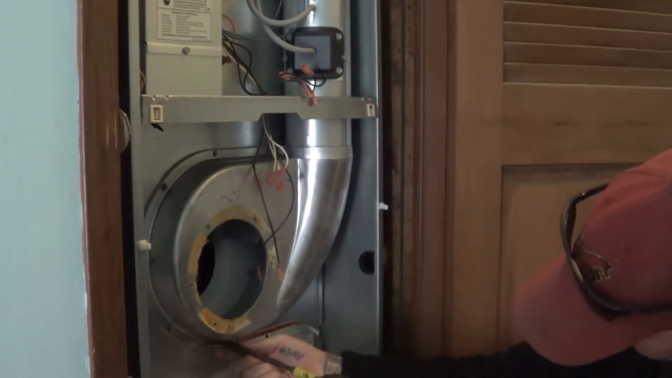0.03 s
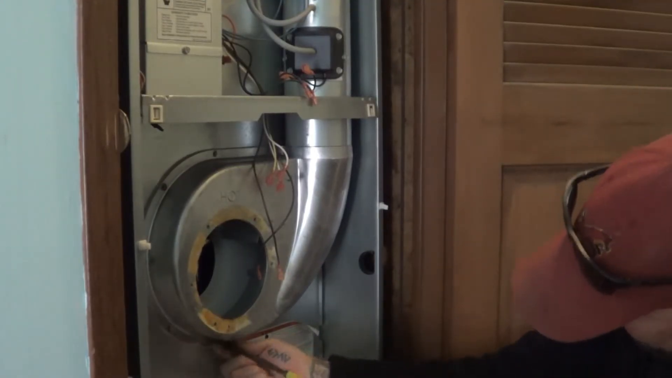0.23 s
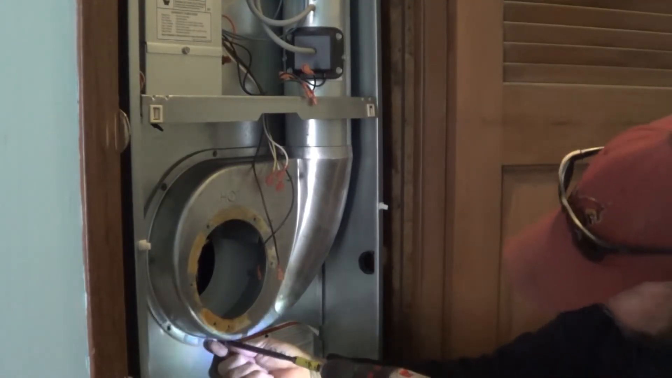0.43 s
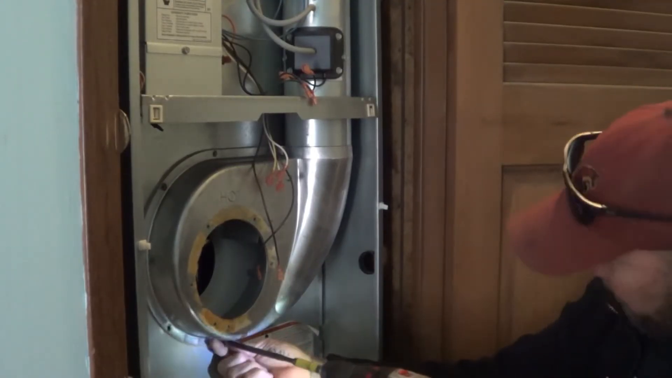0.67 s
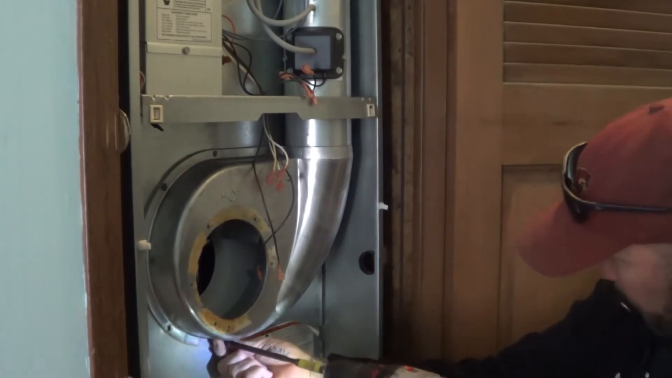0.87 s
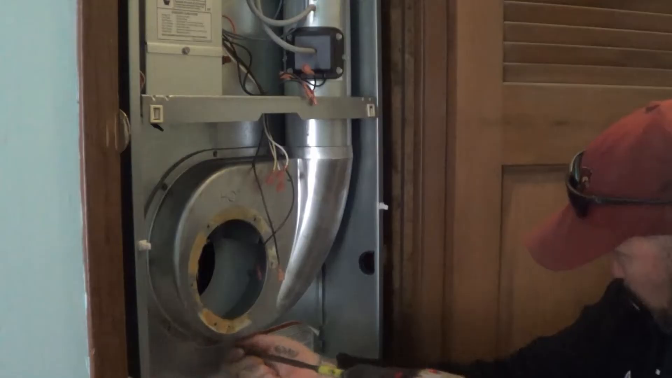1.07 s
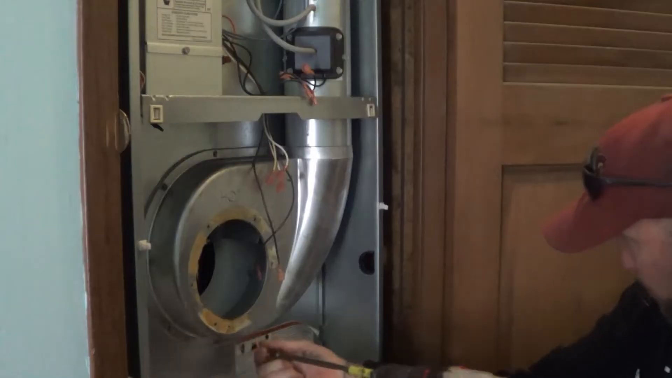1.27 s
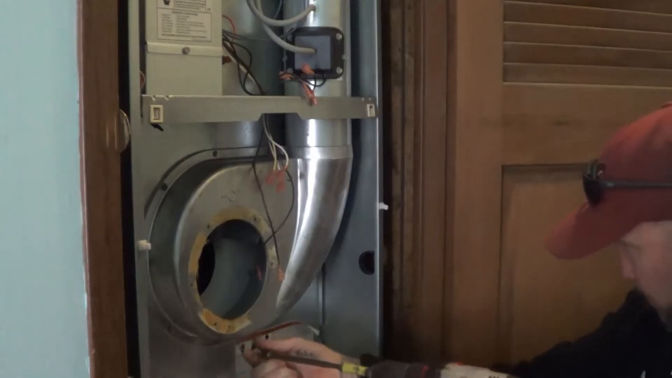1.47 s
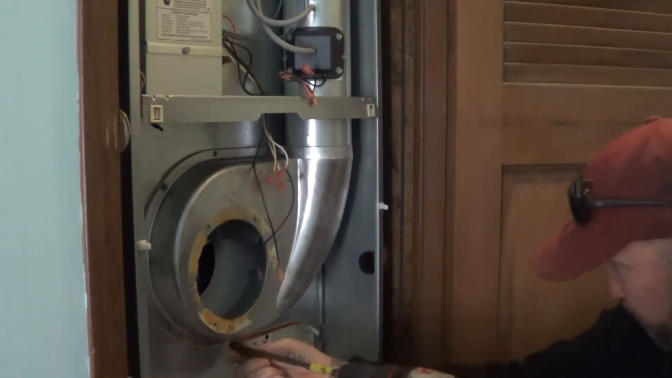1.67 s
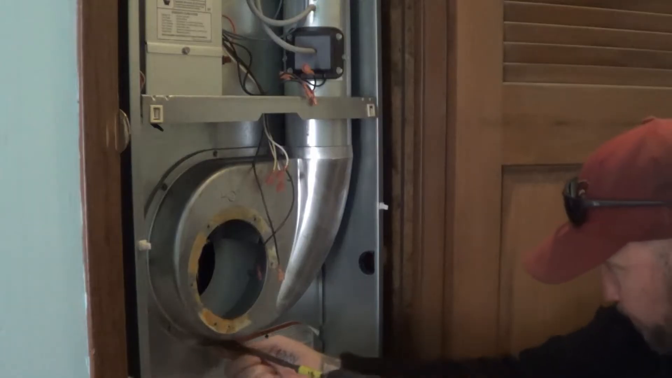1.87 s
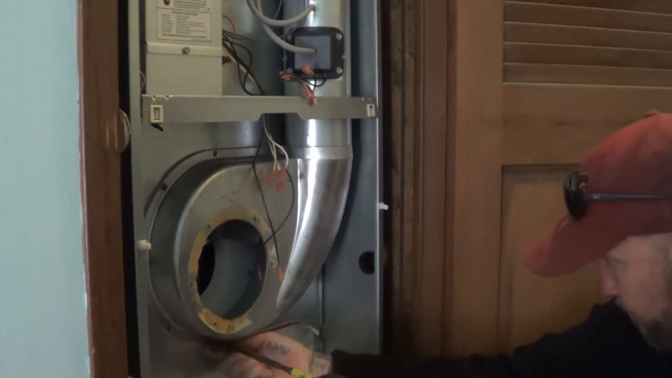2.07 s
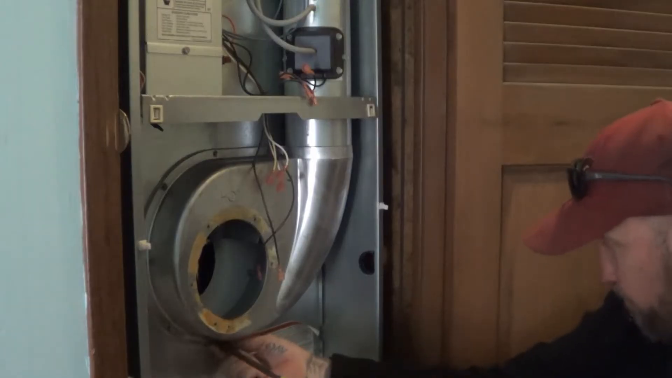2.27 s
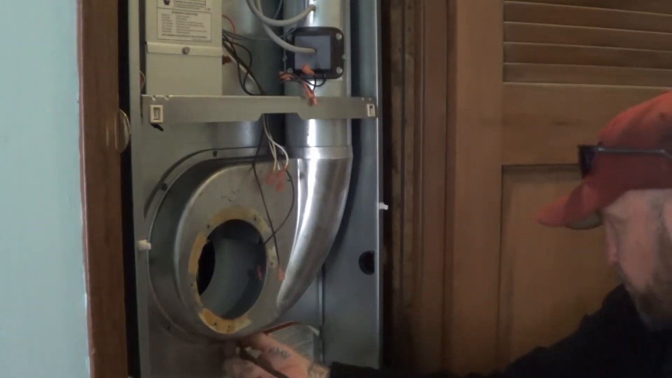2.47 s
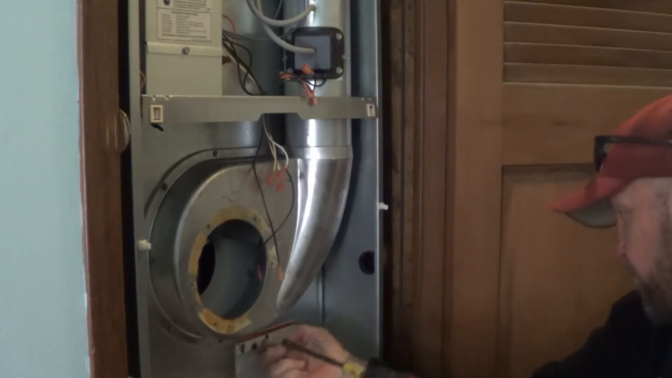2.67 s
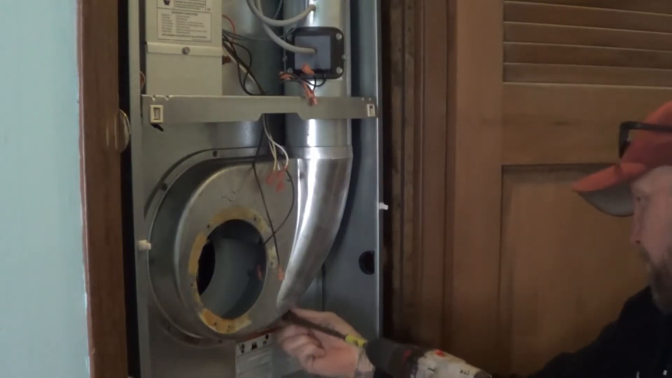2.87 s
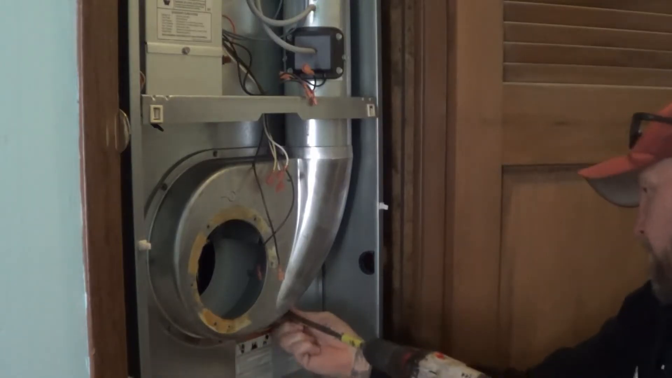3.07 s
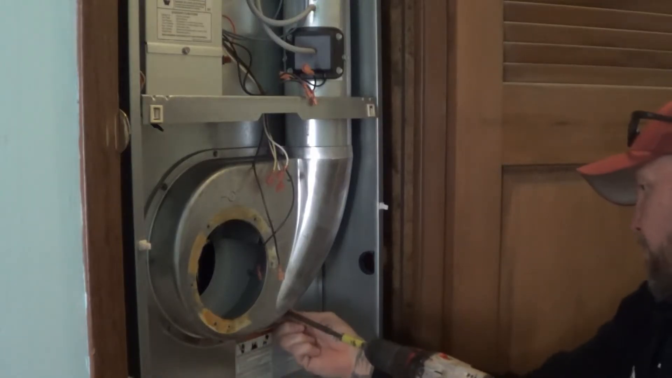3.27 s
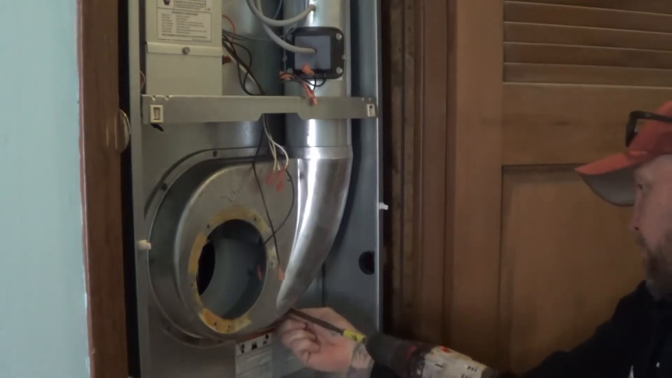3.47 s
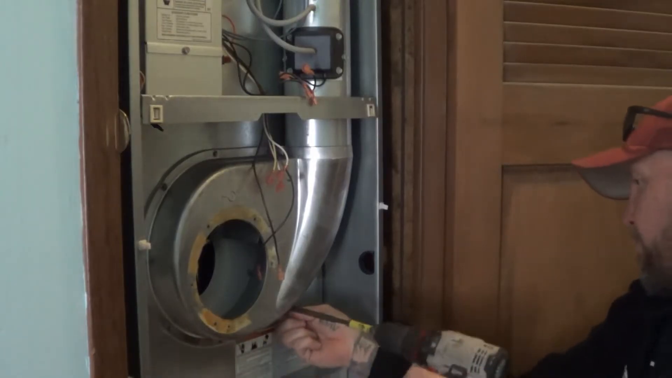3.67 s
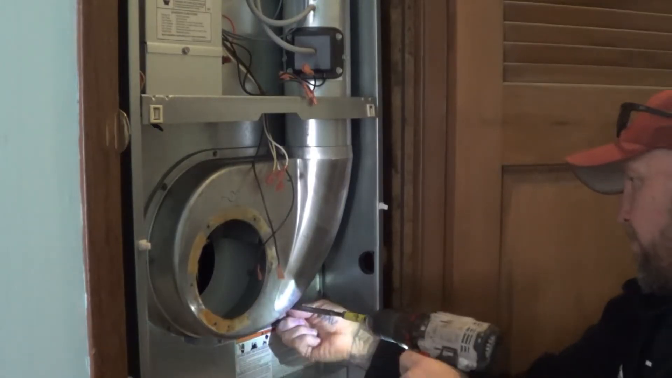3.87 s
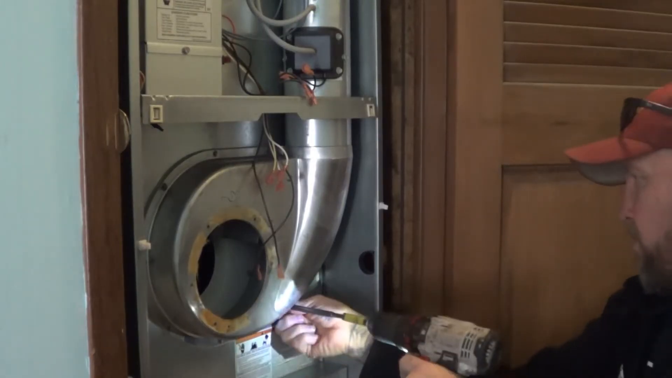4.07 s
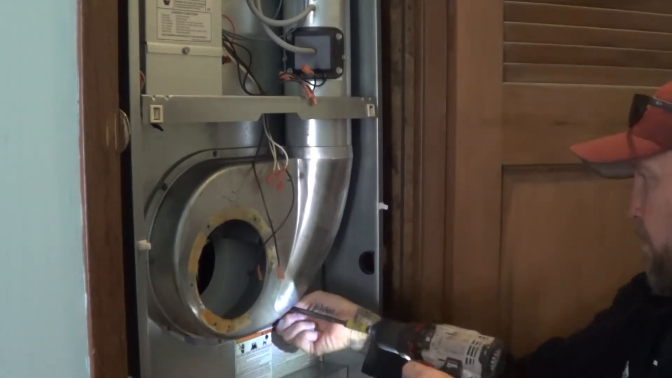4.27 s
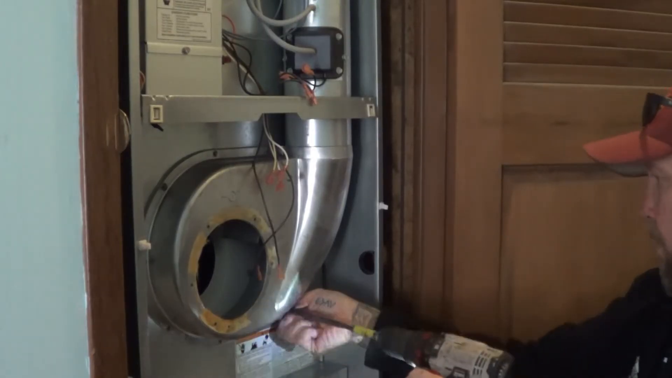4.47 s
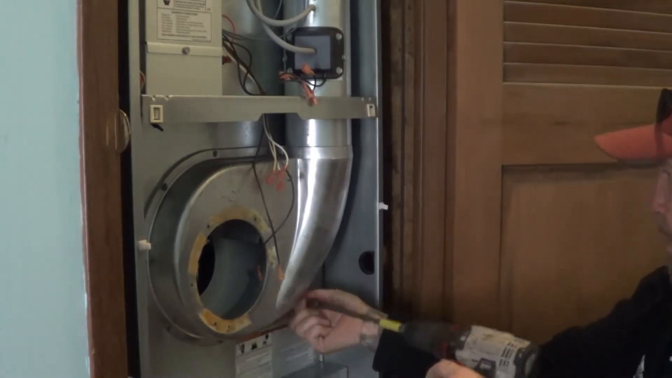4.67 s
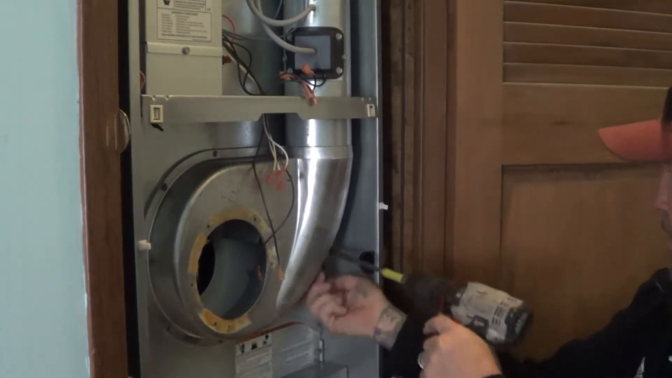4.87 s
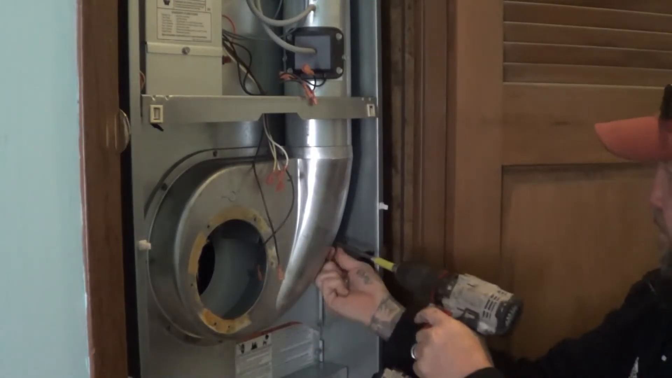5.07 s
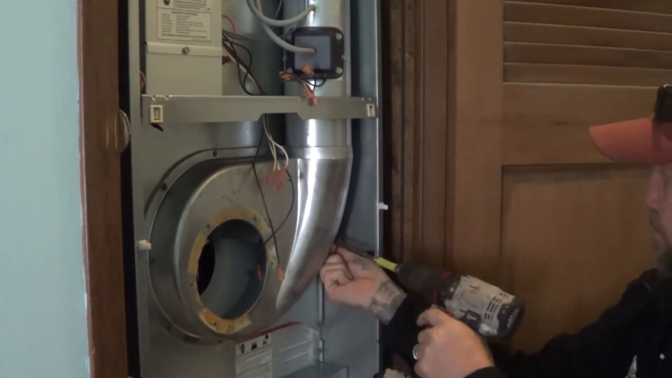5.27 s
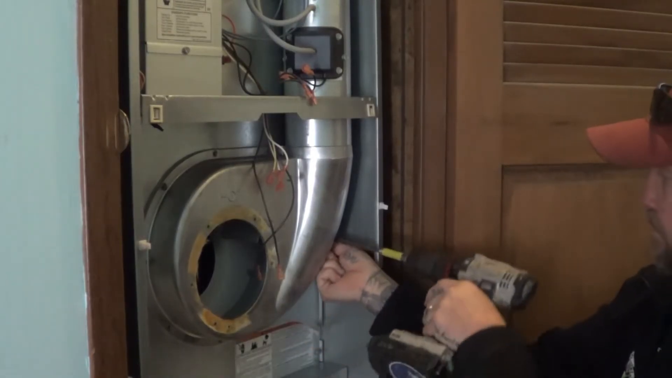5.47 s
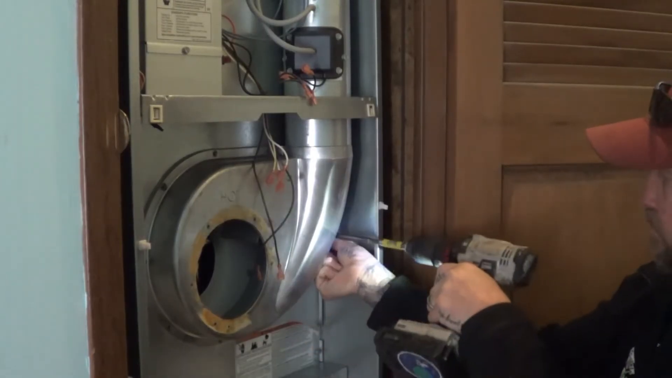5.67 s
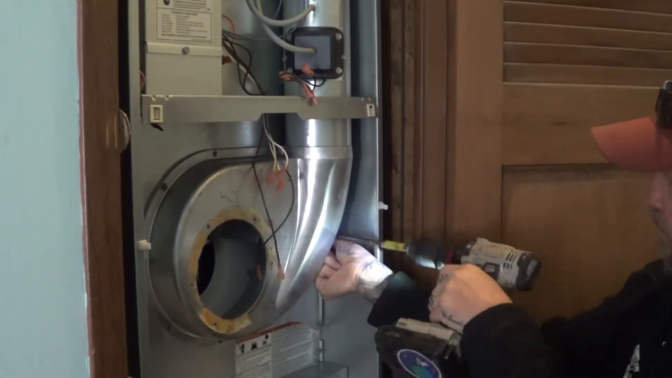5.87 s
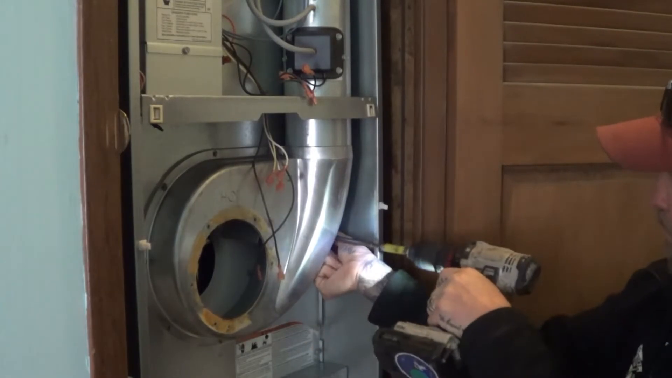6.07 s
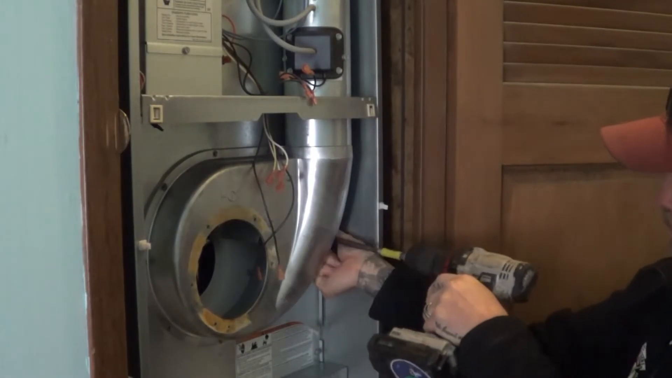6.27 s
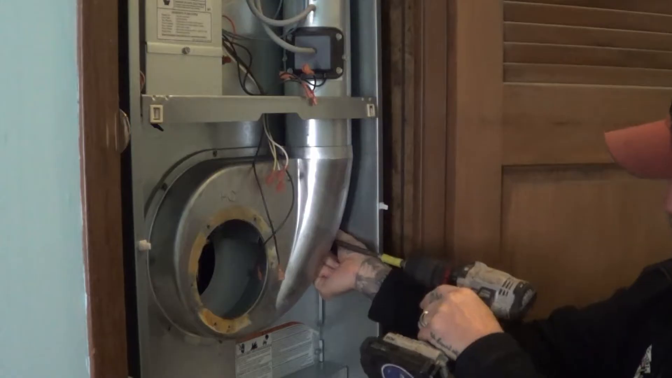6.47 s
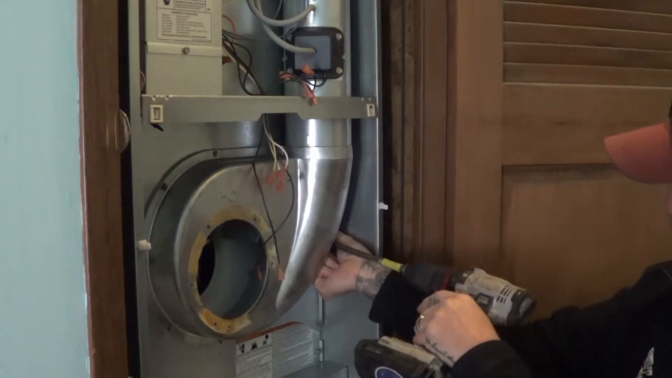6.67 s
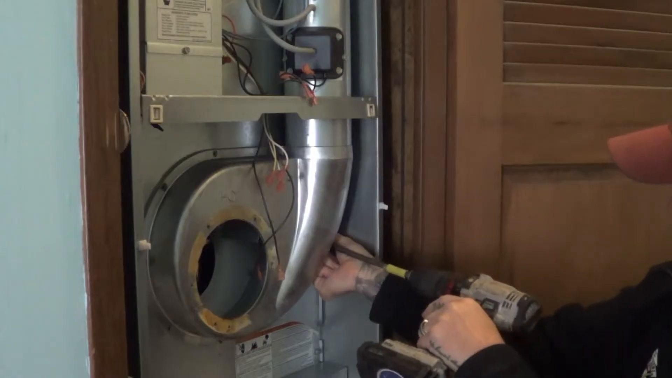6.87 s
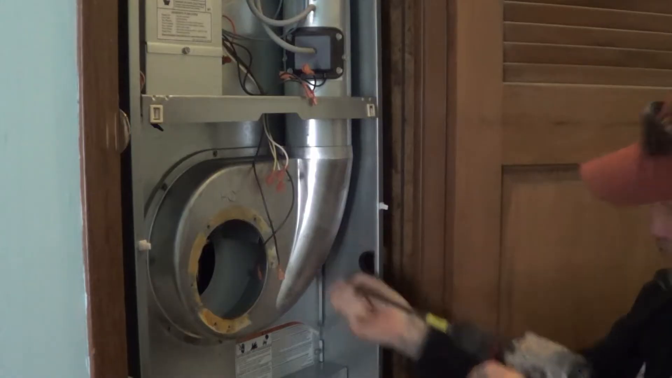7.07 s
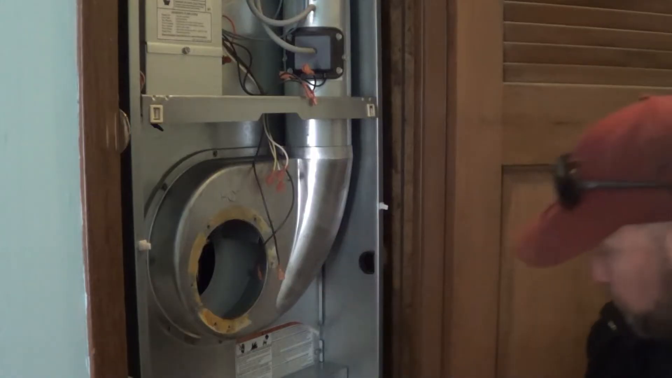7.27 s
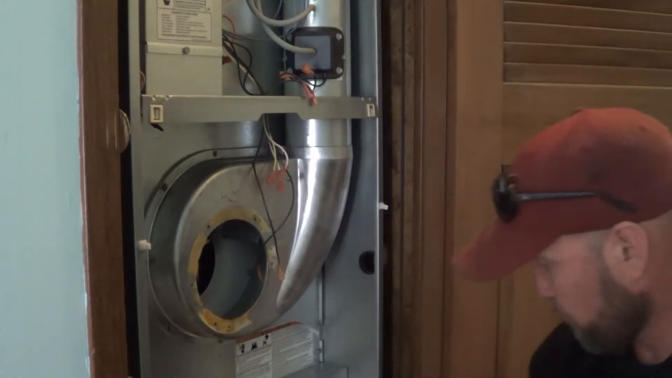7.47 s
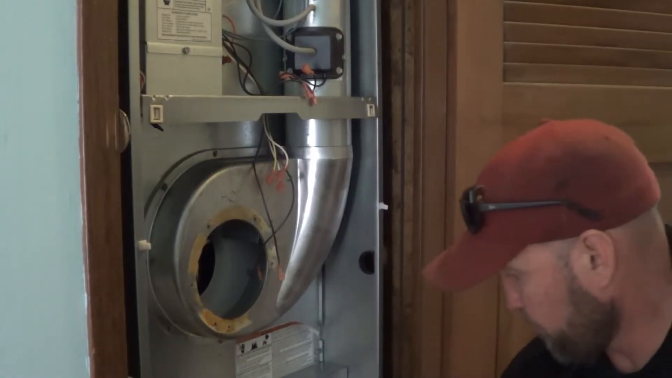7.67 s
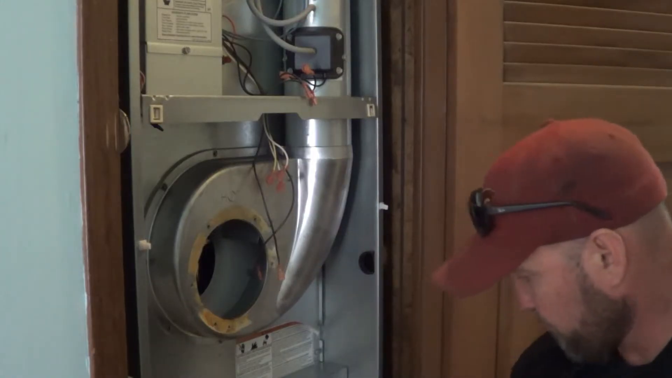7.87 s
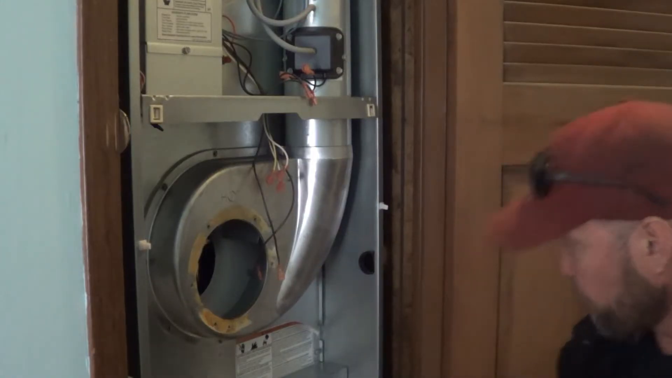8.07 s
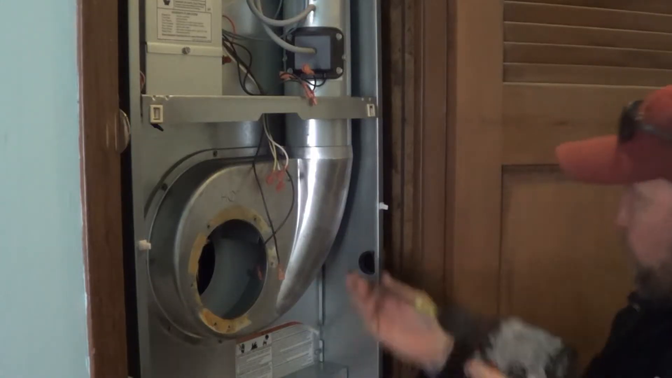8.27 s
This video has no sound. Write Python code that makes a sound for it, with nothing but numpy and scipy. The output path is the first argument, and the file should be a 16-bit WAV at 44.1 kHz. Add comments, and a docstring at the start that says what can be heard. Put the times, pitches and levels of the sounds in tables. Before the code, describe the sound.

A cordless drill whirs in three half-second gritty bursts and a final blip, rattling sheet metal, with knocks, scrapes and clicking loose screws between.

```python
"""A cordless drill backs four screws out of a sheet-metal blower housing in a small room.
Each pull spins up against a tight screw: pulsed grit, gear tones and a shaken panel, brighter with speed.
Between the runs the long bit knocks, rubs and slides on the panels: noise bursts and ringing modes.
Loose screws click together, over room rumble, hiss and electrical tones.
The microphone's limiter ducks the room after every loud moment."""
import sys
import numpy as np
from scipy import signal
from scipy.fft import rfft, irfft
from scipy.io import wavfile
from scipy.ndimage import uniform_filter1d

SR = 44100
rng = np.random.default_rng(int(sys.argv[2]) if len(sys.argv) > 2 else 0)


def waveform_to_disk(signal):
    """Save audio, clipped to [-1, 1], as 16-bit WAV at the path in sys.argv[1]."""
    frames = np.transpose(np.atleast_2d(signal))
    scaled = np.clip(frames, -1, 1) * 32767
    samples = np.round(scaled).astype(np.int16)
    wavfile.write(sys.argv[1], SR, samples)


N = 366471
TIME = np.arange(N) / SR
# The ranges in which the sheet metal answers: tick, sparkle, clang, thump, boom.
# Each row: low edge in Hz, high edge in Hz.
RANGES = [(3800, 9500), (9500, 17000), (1100, 3800), (400, 1100), (55, 400)]


def drill(body, grind_db=6.0, hiss_db=-3.5, clang_db=2.5, boom_db=2.0, rattle_db=-21.0):
    """Gears and screw thread grind unevenly, pulsing with each motor turn, and shake the panels."""
    # Colour of the grind. Each row: frequency in Hz, level in dB per Hz.
    grind_colour = [(410, -37), (700, 2), (777, -23), (984, 3), (1280, -6), (1380, 0.5), (2330, 0.5),
                    (2700, -1), (3790, 2.5), (6150, -1), (7590, 4), (10400, -1.5), (11700, 1.5),
                    (13300, -2), (16000, -14)]
    # Motor and gear tones. Each row: multiple of the turn rate, relative level in dB at full speed.
    gear_tones = [(1, -22), (5, -14), (12, -9.5)]
    gate, pace, speed, level, top, clang, boom = trigger()
    turns = 2 * np.pi * np.cumsum(speed * (1 + 0.0018 * flutter(14, 61))) / SR

    throb = 1 + 0.19 * np.sin(turns)
    force = gate * from_db(level + grind_db) * throb
    near_panels = near_and_room(grind_colour, room_db=-10.5, near_s=0.0061)
    teeth = through(force * grit(per_s=4000, spread_db=2.0), near_panels)
    grind = teeth + from_db(hiss_db) * force * stereo_noise(grind_colour, N)

    # the treble grows or shrinks with speed; at -4 dB it is left as it is
    high_pass = signal.butter(2, 9000, "high", fs=SR, output="sos")
    treble = signal.sosfiltfilt(high_pass, grind)
    grind = grind + treble * (from_db(top + 4.0) - 1)

    # the motor sings louder the faster it turns and the harder it works
    whine = sum(from_db(db) * np.sqrt(2) * np.sin(round(k) * turns) for k, db in gear_tones)
    loading = pace ** 3.1 * from_db(0.91 * level)
    whine = whine * gate * loading * (1 + 0.75 * flutter(11, 27))

    # the bit jumps in the screw head, and the screw shakes the sheet that holds it
    rattle = through(force * grit(per_s=62, spread_db=1.5), body[2])
    shake = gate * grit(per_s=400, spread_db=2.5)
    thumping_panel = through(shake * clang * from_db(clang_db), body[3])
    booming_panel = through(shake * boom * from_db(boom_db), body[4])
    return grind + whine + from_db(rattle_db) * rattle + thumping_panel + booming_panel


def trigger():
    """Each pull spins the motor up against a tight screw, holds and brakes; the screw shakes its panel."""
    # The trigger pulls. Each row: start in seconds, time held in seconds, top speed in turns per second,
    # spin-up in seconds, relative grind level in dB, relative treble above 9 kHz at top speed in dB,
    # relative breakaway jolt in dB.
    pulls = [(0.562, 0.49, 287, 0.125, -18.5, 1.5, -13.5), (3.921, 0.64, 204, 0.16, -24, 0.5, -21.5),
             (5.687, 0.63, 246, 0.185, -18, -1, -6.5), (7.797, 0.16, 220, 0.03, -19, 2.5, -56)]
    # A half-freed screw wobbles. Each row: middle in seconds, half length in seconds, relative level in dB.
    wobbles = [(0.85, 0.16, -21.5), (4.468, 0.029, -29), (6.019, 0.041, -15), (6.196, 0.084, -16.5)]
    kick_share = 0.45  # of the top speed, at once
    ease_s, coast_s = 0.1, 0.175  # the motor eases off this long before release, over this time
    attack_s, brake_db_per_s = 0.0021, 243
    tight_db, freeing_s = 4, 0.21  # a tight screw grinds louder until it works free
    treble_follows = 1.77  # dB of treble per dB of speed
    jolt_s, jolt_boom_db = 0.031, -7  # decay of the jolt, its boom against its clang
    steady_clang_db, steady_boom_db = -16, -18  # against the grind

    pull = np.maximum(np.searchsorted([row[0] for row in pulls], TIME) - 1, 0)
    start, held, top_speed, spin_up, grind_db, treble_db, jolt_db = np.array(pulls)[pull].T
    age = np.maximum(TIME - start, 0)
    gate = np.minimum(age / attack_s, 1) * from_db(-brake_db_per_s * np.clip(age - held, 0, 1))
    easing = np.exp(-np.clip((age - held + ease_s) / coast_s, 0, 2) ** 2)
    pace = (1 - (1 - kick_share) * np.exp(-age / spin_up)) * easing
    level = grind_db + tight_db * np.exp(-age / freeing_s)
    top = treble_db + treble_follows * 20 * np.log10(pace)

    jolt = from_db(jolt_db) * np.exp(-age / jolt_s)
    wobble = sum(from_db(db) * swell(s, half_s) for s, half_s, db in wobbles)
    clang = jolt + wobble + from_db(grind_db + steady_clang_db)
    boom = from_db(jolt_boom_db) * jolt + wobble + from_db(grind_db + steady_boom_db)
    return gate, pace, pace * top_speed, level, top, clang, boom


def short_tones(waver=0.006, flicker_db=5.5):
    """Short, unsteady tones as the motor spins up or runs down, or the housing rings."""
    # Each row: middle in seconds, half length in seconds, mean pitch in Hz, relative level in dB.
    tone_rows = [(1.015, 0.043, 2330, -19), (4.545, 0.024, 1704, -25), (5.79, 0.019, 1926, -18)]
    bent_time = np.cumsum(1 + waver * flutter(20, 150)) / SR
    flicker = from_db(flicker_db * flutter(12, 73))
    tones = 0
    for s, half_s, hz, db in tone_rows:
        tones = tones + from_db(db) * swell(s, half_s) * np.sin(2 * np.pi * hz * bent_time)
    return flicker * tones


def knocks(body, contact_s=0.016, rise_share=0.23, chatter_power=1.01):
    """Each blow chatters for some milliseconds, longest in the bass, and leaves the housing ringing."""
    # Bit and drill strike the housing, or the screw jerks in its hole. Each row: time in seconds,
    # relative strength in dB, hardness in dB per octave, ring of the struck part in dB, its pitch in Hz.
    blows = [(0.171, -37, -0.5, 1, 200), (0.187, -29, -0.5, 7.5, 193), (0.289, -35.5, 1.1, 10, 3440),
             (0.8711, -16.5, 0.5, -1.5, 700), (0.9841, -25, 2, 13, 2510), (1.019, -24.5, 2, 8.5, 4470),
             (1.106, -25.5, 2, 8.5, 2480), (1.87, -27.5, -2.6, -1.5, 700), (1.926, -24.5, -1.3, 1.5, 700),
             (1.938, -24, 0.2, 7.5, 2570), (1.983, -19.5, 0.5, 6, 380), (2.1597, -28.5, -2.5, 23, 12300),
             (2.331, -27.5, -0.7, 3, 2500), (2.3447, -23.5, 3, 3.5, 6950), (3.379, -39, -0.5, 21, 1300),
             (3.413, -25.5, -2.5, 7.5, 530), (3.43, -45, 0.5, 11, 8000), (3.5853, -35, -1.7, 1.5, 2480),
             (3.7362, -19, -2, 4, 312), (4.468, -34, -3, 4, 700), (4.999, -25, 2.5, 12.5, 2580),
             (5.0611, -20.5, -1.2, 8, 680), (5.075, -18, -2, -4, 500), (5.3913, -23, -1.5, 15, 4460),
             (5.404, -19, -3.2, 13, 4000), (5.464, -28, -0.5, 6.5, 9000), (6.0452, -21.5, 0, 7, 700),
             (6.1625, -26, -4, 11, 1980), (6.5204, -30, 2.5, 12.5, 2480), (6.56, -30, 1.5, 12.5, 4460),
             (7.6944, -40.5, 0.5, 7.5, 1300), (8.0145, -23.5, 2.5, 3, 2480),
             (8.0583, -21.5, 0.5, 3.5, 4520), (8.1009, -31, 4.5, 9, 3000), (8.18, -37, 0.7, 7, 2500),
             (8.2429, -43, 1.5, 11, 3470)]
    # A blow in each range of the metal. Each row: ringing in dB, contact noise in dB, stretch of contact_s.
    blow_by_range = [(-3.5, 7.5, 0.7), (-7, 3.5, 0.72), (-5, 5, 1.12), (-3, 5.5, 1.55), (-6, 3, 2.2)]
    # Colour of the bare contact. Each row: frequency in Hz, level in dB per Hz.
    contact_colour = [(50, -5.5), (110, 3.5), (800, -10.5), (3000, -11.5), (10000, -15.5), (16000, -23)]
    t = np.arange(body[0].shape[1]) / SR
    out = np.zeros((2, N + len(t)))
    for s, *blow in blows:
        levels = blow_levels(*blow)
        at = int(s * SR)
        chatter = stereo_noise(contact_colour, size=8192)
        for db, ringing, edges, row in zip(levels, body, RANGES, blow_by_range):
            ring_db, contact_db, stretch = row
            age = t[:chatter.shape[1]] / (contact_s * stretch)
            contact = np.exp(-age ** chatter_power) * (1 - np.exp(-age / rise_share))
            noise = rms_one(band(chatter, *edges))
            out[:, at:at + len(age)] += from_db(db + contact_db) * contact * noise
            # the ringing is levelled by its first 50 ms
            out[:, at:at + len(t)] += from_db(db + ring_db) * ringing / np.std(ringing[:, :SR // 20])
    return out[:, :N]


def blow_levels(db, hardness, ring_db, part_hz, pivot_hz=1500, part_octaves=1.31):
    """A hard contact favours the treble above the pivot, and the struck part rings around its own pitch."""
    hz = np.sqrt(np.prod(RANGES, axis=1))
    part = np.exp(-(np.log2(hz / part_hz) / part_octaves) ** 2)
    return db + hardness * np.log2(hz / pivot_hz) + ring_db * part


def slides(body, hiss_db=-9.0, clang_db=-19.0, boom_db=-4.0, duct_db=-2.0):
    """Fine friction rasps at the contact, resonates in the duct and feeds the ringing panels."""
    # Hand and bit slide over the metal; the hand is soft and booms, the bit is hard and hisses. Each row:
    # middle in seconds, half length in seconds, relative rasp in dB, softness as boom against rasp in dB.
    strokes = [(-0.004, 0.11, -37.5, 21), (0.46, 0.061, -58, 4), (2.575, 0.039, -37.5, -5),
               (2.86, 0.048, -44.5, -19), (2.897, 0.25, -65, 19), (3.561, 0.23, -39.5, -5),
               (5.343, 0.13, -36.5, -6), (6.762, 0.083, -33.5, -11), (6.971, 0.043, -17, -13.5),
               (7.08, 0.22, -39.5, -17)]
    # Resonances of the rubbed duct. Each row: frequency in Hz, width in Hz, relative level in dB.
    duct_modes = [(717, 64, 11.5), (1166, 45, 15.5), (1480, 240, 10.5), (2350, 280, 9), (2780, 110, 8.5),
                  (3320, 560, 4.5), (5260, 100, -13), (8000, 320, -34), (11600, 210, -22)]
    soft_dulls = 0.31  # dB of hiss lost per dB of softness
    rub = hiss = boom = 0
    for s, half_s, db, soft_db in strokes:
        stroke = swell(s, half_s)
        rub = rub + from_db(db) * stroke
        hiss = hiss + from_db(db - soft_dulls * soft_db) * stroke
        boom = boom + from_db(db + soft_db) * stroke

    friction = grit(per_s=5000, spread_db=1.5)
    rasp = stereo_noise([(50, 0), (16000, 0)], N)
    duct = 0
    for k, (hz, width, db) in enumerate(duct_modes):
        b, a = signal.iirpeak(hz, hz / width, fs=SR)
        duct = duct + (-1) ** k * from_db(db) * signal.lfilter(b, a, rasp)

    hissing = hiss * from_db(hiss_db) * rms_one(band(rasp, 5900, 9600, order=1))
    rubbing = rub * from_db(duct_db) * rms_one(duct)
    clanging = through(friction * rub * from_db(clang_db), body[2] + body[3])
    booming = through(friction * boom * from_db(boom_db), body[4])
    return hissing + rubbing + clanging + booming


def screws(level_db=-2.0, click_s=0.00071, ring_s=0.0074, ring_db=-10.5, tail_db=-14.0):
    """Loose screws make small sharp clicks, each new noise, with a brief ring and a faint room tail."""
    # Each row: time in seconds, relative level in dB.
    screw_clicks = [(2.6987, -18), (4.817, -15), (4.828, -17), (5.531, -24), (7.082, -24), (7.348, -22),
                    (7.405, -17), (7.444, -17), (7.4662, -14.5), (7.4884, -23), (7.5073, -20),
                    (7.6049, -21), (7.655, -29), (7.7265, -18.5)]
    # Colour of a click. Each row: frequency in Hz, level in dB per Hz.
    screw_colour = [(880, -37), (1500, -13.5), (3030, -13.5), (3280, -6), (5120, -9.5), (9280, 7),
                    (13100, -2), (16000, -6)]
    out = np.zeros((2, N))
    t = np.arange(8192) / SR
    fade = np.exp(-t / click_s) + from_db(ring_db) * np.exp(-t / ring_s)
    for s, db in screw_clicks:
        click = stereo_noise(screw_colour, len(t)) * fade
        click = click + from_db(tail_db) * dying(screw_colour, len(t))
        at = int(s * SR)
        out[:, at:at + len(t)] += from_db(db + level_db) * click[:, :N - at]
    return out


def housing(split_hz=3.9):
    """The response of the sheet metal in each range; its modes come in close, beating pairs."""
    # Colour of the dense panel ringing. Each row: frequency in Hz, level in dB per Hz.
    panel_colour = [(29, -37), (50, -12.5), (98, 2), (213, 2.5), (507, -9.5), (586, -1.5), (711, 3),
                    (1330, -4.5), (2270, -2), (4350, -16.5), (4790, -13.5), (6390, -10), (7760, -8),
                    (13500, -34.5), (16000, -65.5)]
    # The strongest modes. Each row: centre of the pair in Hz, relative level in dB, t60 in seconds.
    modes = [(113, -17, 1.2), (135, -20, 1.3), (192, -22, 1.0), (232, -17, 1.2), (285, -18, .9),
             (349, -16, .8), (425, -19, .7), (508, -17, .5), (718, -12, .35), (754, -13, .5),
             (843, -17, .35), (1147, -25, .9), (1430, -19, .65), (1793, -21, .4), (1885, -23, .85),
             (2350, -18, .7), (2696, -26, .65), (2905, -25, .45), (3330, -24, .45), (3790, -28, .35),
             (5650, -36, .6)]
    response = dying(panel_colour)
    t = np.arange(response.shape[1]) / SR
    for hz, db, t60 in modes:
        decay = np.exp(-np.log(1000) * t / t60)
        for twin_hz in hz + split_hz * rng.standard_normal(2):
            # the phase differs somewhat between left and right
            phase = rng.uniform(0, 2 * np.pi) + rng.normal(0, 0.78, (2, 1))
            response = response + from_db(db) * np.sin(2 * np.pi * twin_hz * t + phase) * decay
    return [unit_energy(band(response, low, high)) for low, high in RANGES]


def near_and_room(spectrum, room_db, near_s):
    """Quick reflections off the nearby panels, then the room's tail."""
    tail = dying(spectrum)
    size = tail.shape[1]
    near = stereo_noise(spectrum, size) * np.exp(-np.arange(size) / SR / near_s)
    return unit_energy(unit_energy(near) + from_db(room_db) * unit_energy(tail))


def dying(spectrum, size=65536):
    """Dense ringing of housing and room, in which every band dies at its own rate."""
    # Each row: frequency in Hz, t60 in seconds.
    ring_decay = [(70, 1.56), (200, 1.41), (450, 1.46), (900, 0.57), (2500, 0.47), (6000, 0.26),
                  (10000, 0.17), (15000, 0.39)]
    noise = rfft(stereo_noise(spectrum, size))
    hz, t = np.fft.rfftfreq(size, 1 / SR), np.arange(size) / SR
    centres = np.array(ring_decay)[:, 0]
    out = 0
    for own, (_, t60) in zip(np.eye(len(ring_decay)), ring_decay):
        share = at_hz(np.c_[centres, own], hz)  # crossfades into the neighbouring bands
        out = out + irfft(noise * share, size) * np.exp(-np.log(1000) * t / t60)
    return out


def stereo_noise(spectrum, size):
    """Coloured noise whose left-right likeness depends on frequency; rms 1."""
    # Each row: frequency in Hz, left-right likeness from 0 to 1.
    likeness = [(30, 1), (70, 1), (250, 0.73), (500, 0.2), (1500, 0.56), (4000, 0.58), (8000, 0.8),
                (13000, 1)]
    hz = np.fft.rfftfreq(size, 1 / SR)
    alike = np.clip(at_hz(likeness, hz), -1, 1)
    mid, side = rfft(rng.standard_normal((2, size)))
    both = np.sqrt(1 + alike) * mid + np.sqrt(1 - alike) * side * [[1], [-1]]
    return rms_one(irfft(both * from_db(at_hz(spectrum, hz)), size))


def grit(per_s, spread_db):
    """Tiny metal contacts at random, of uneven size; rms 1."""
    sizes = from_db(spread_db * np.minimum(rng.exponential(1, N), 4)) * rng.choice([-1, 1], N)
    return rms_one(sizes * (rng.random(N) < per_s / SR))


def flutter(low_hz, high_hz):
    """Random unsteadiness between two rates; spread 1."""
    return rms_one(band(rng.standard_normal(N), low_hz, high_hz, order=1))


def swell(middle_s, half_s):
    """A bell-shaped rise and fall of height 1, down to 1/e at half_s from the middle."""
    return np.exp(-np.minimum(((TIME - middle_s) / half_s) ** 2, 50))


def through(force, response):
    """Play a force through a stereo response."""
    return signal.fftconvolve(force[None], response, axes=1)[:, :N]


def unit_energy(response):
    """Scale a response so that steady noise keeps its level."""
    return response / np.sqrt(np.sum(response ** 2) / 2)


def band(x, low_hz, high_hz, order=3):
    """Causal band-pass."""
    sos = signal.butter(order, [low_hz, min(high_hz, .45 * SR)], "band", fs=SR, output="sos")
    return signal.sosfilt(sos, x)


def from_db(db):
    """Decibels to gain."""
    return 10 ** (np.asarray(db) / 20)


def rms_one(x):
    """Scale to rms 1."""
    return x / np.sqrt(np.mean(x ** 2) + 1e-20)


def at_hz(points, hz):
    """Read a table on a log-frequency axis."""
    f, value = np.transpose(points)
    return np.interp(np.log(np.maximum(hz, 1)), np.log(f), value)


def background(air_db=-38.5):
    """Room rumble and hiss as coloured noise, and steady electrical tones as sines."""
    # Colour of the room air. Each row: frequency in Hz, level in dB per Hz.
    air_colour = [(15, -40), (25, -4), (70, -1), (137, -7), (175, -14), (335, -10), (416, -7), (516, -12.5),
                  (840, -12.5), (1840, -20), (2220, -20.5), (3080, -21), (16000, -26.5)]
    # Electrical tones. Each row: frequency in Hz, rms level in dB.
    hum_tones = [(59.5, -77), (220.7, -51.5), (15735, -56)]
    tones = sum(from_db(db) * np.sqrt(2) * np.sin(2 * np.pi * hz * TIME) for hz, db in hum_tones)
    return from_db(air_db) * stereo_noise(air_colour, N) + tones


def scene():
    """All the work happens slightly right of centre, in front of the room's background."""
    body = housing()
    work = drill(body) + short_tones() + knocks(body) + slides(body) + screws()
    work_db = 4.0  # level of the work at the microphone
    return work * from_db(work_db) * from_db([[-.2], [.2]]) + background()


def limiter(x, threshold_db=-24.5, slope=0.44, release_db_per_s=3.5, window_s=0.035):
    """The gain drops quickly on loud sound and creeps back."""
    power = uniform_filter1d(np.mean(x ** 2, axis=0), int(window_s * SR))
    level = 10 * np.log10(np.maximum(power, 1e-12))
    over = np.maximum(level - threshold_db, 0) * slope
    # each peak of the reduction is held, then let go at the release rate
    release = release_db_per_s * TIME
    held = np.maximum.accumulate(over + release) - release
    return x * from_db(-uniform_filter1d(held, size=64))


def record(dry):
    """Limiter, full-scale ceiling and a steep top cut."""
    top_cut = signal.ellip(10, .1, 80, 15900, fs=SR, output="sos")  # ripple dB, depth dB, edge Hz
    return signal.sosfilt(top_cut, np.clip(limiter(dry), -1, 1))


dry = scene()
out = record(dry)
waveform_to_disk(out)
```